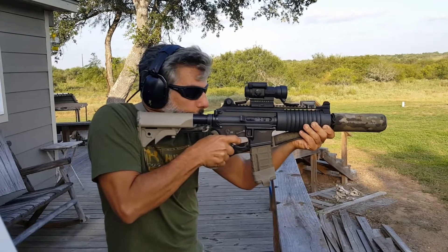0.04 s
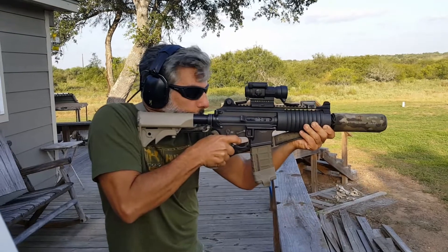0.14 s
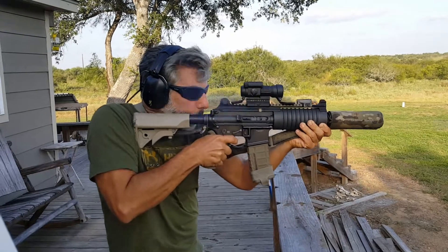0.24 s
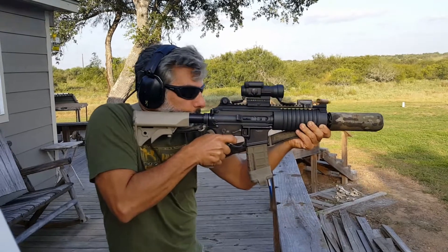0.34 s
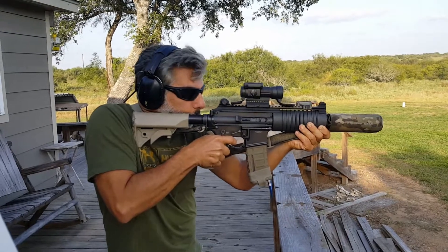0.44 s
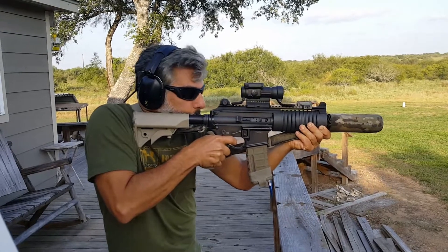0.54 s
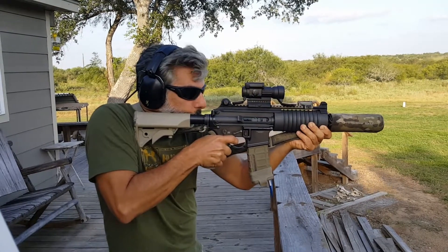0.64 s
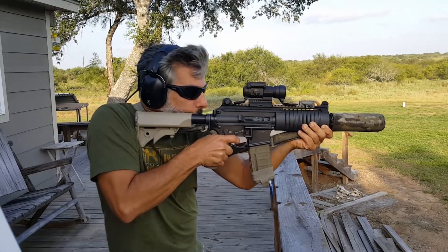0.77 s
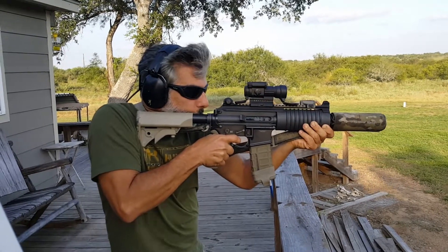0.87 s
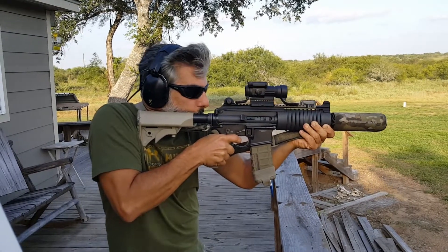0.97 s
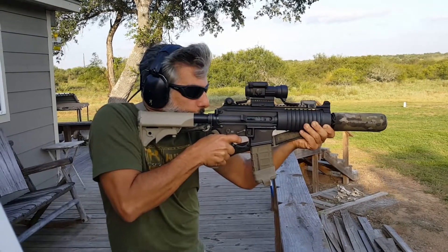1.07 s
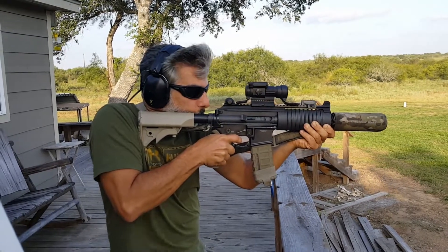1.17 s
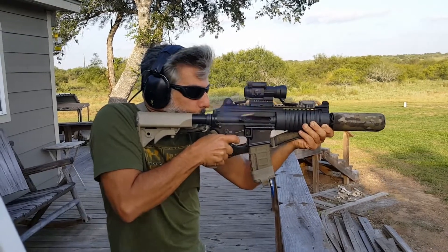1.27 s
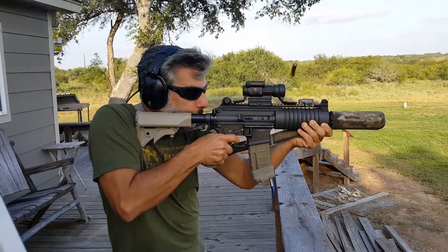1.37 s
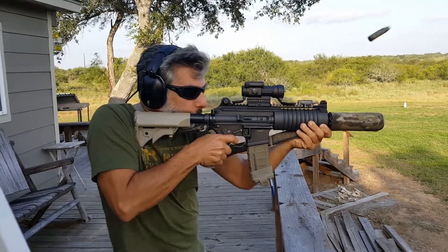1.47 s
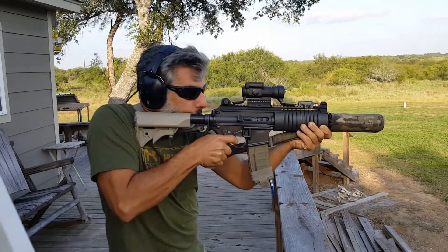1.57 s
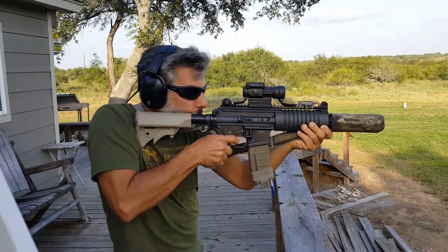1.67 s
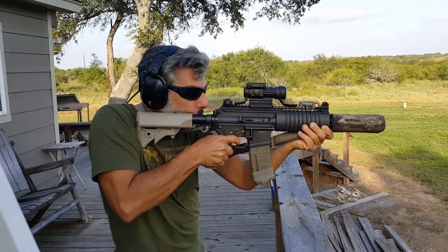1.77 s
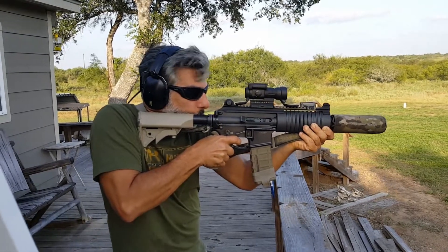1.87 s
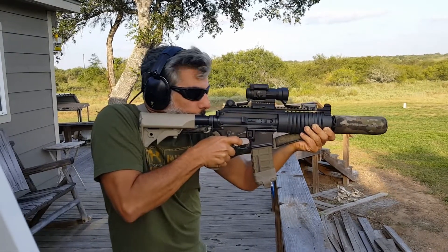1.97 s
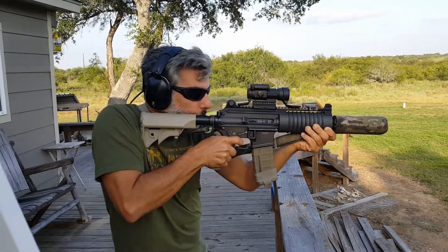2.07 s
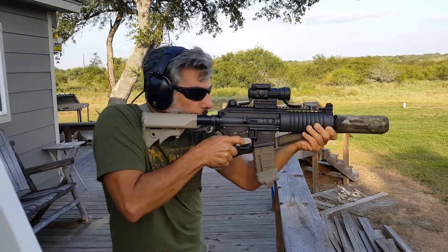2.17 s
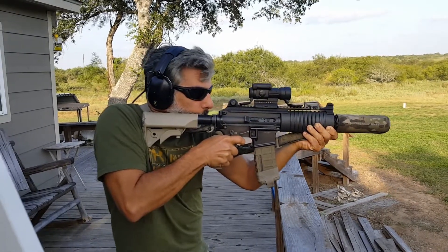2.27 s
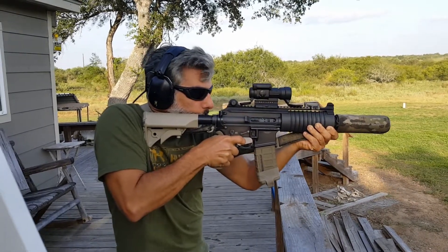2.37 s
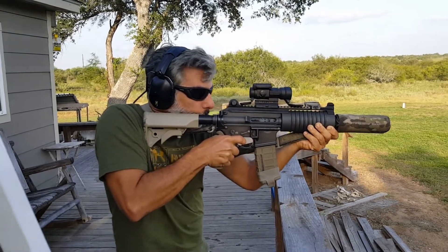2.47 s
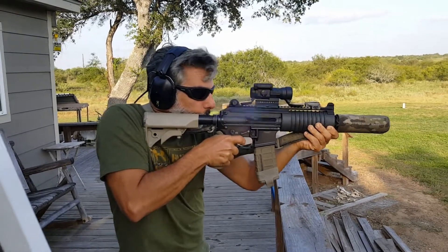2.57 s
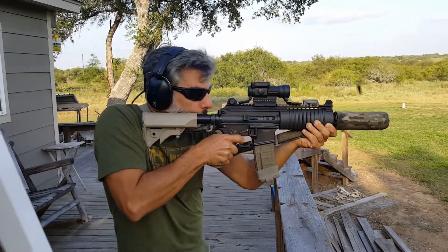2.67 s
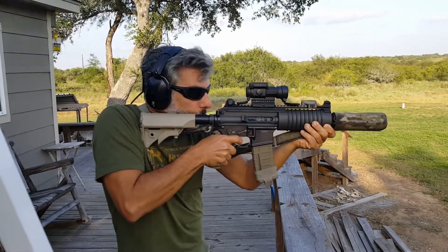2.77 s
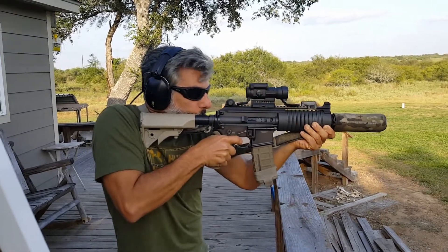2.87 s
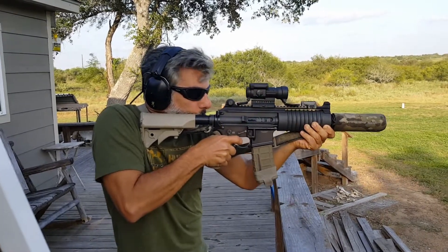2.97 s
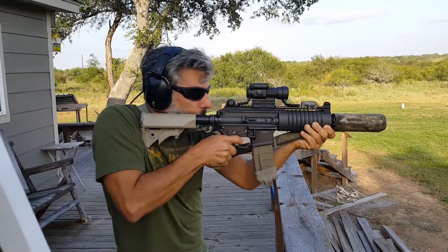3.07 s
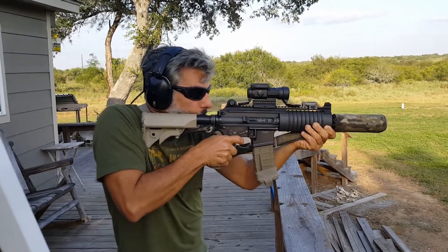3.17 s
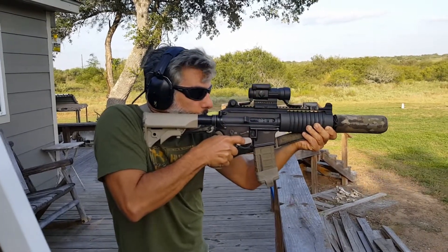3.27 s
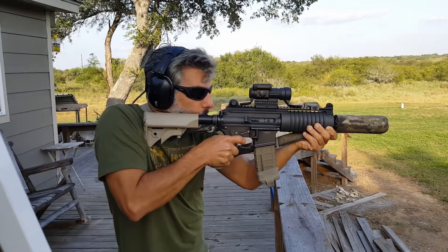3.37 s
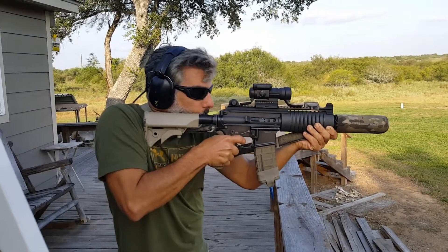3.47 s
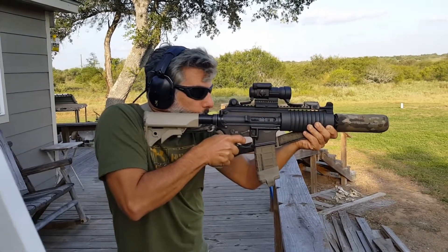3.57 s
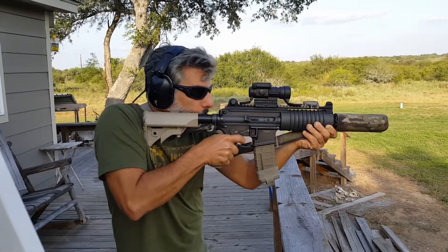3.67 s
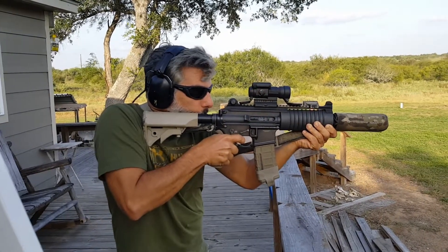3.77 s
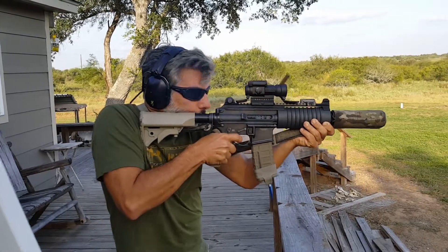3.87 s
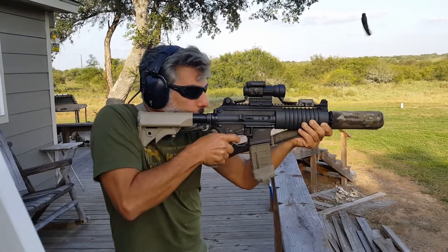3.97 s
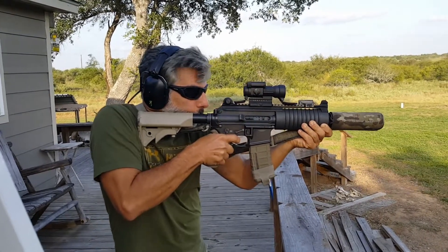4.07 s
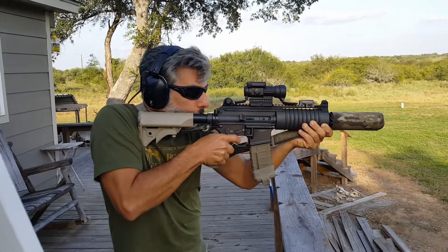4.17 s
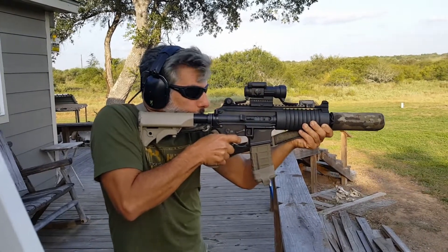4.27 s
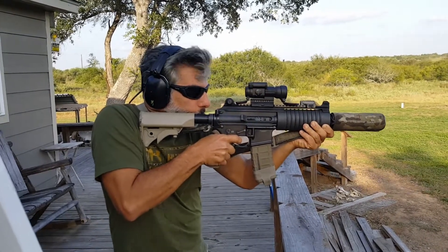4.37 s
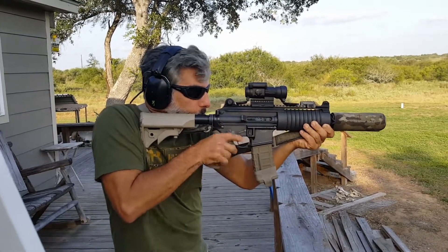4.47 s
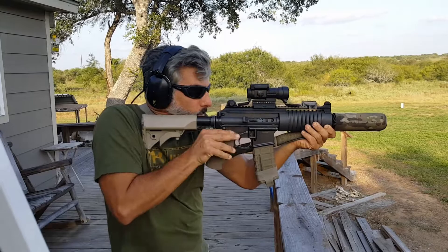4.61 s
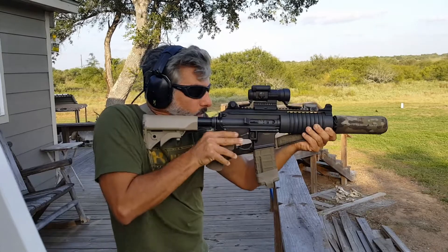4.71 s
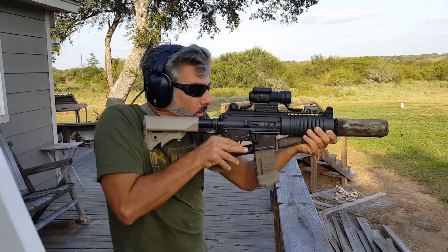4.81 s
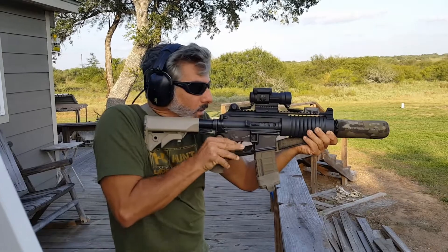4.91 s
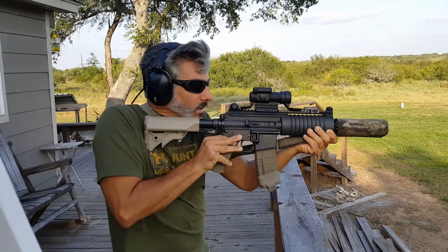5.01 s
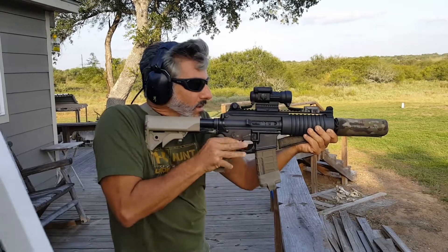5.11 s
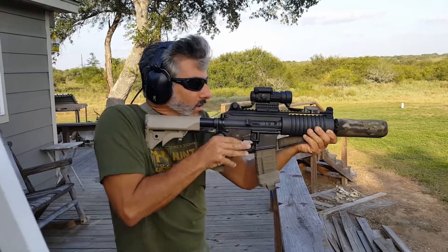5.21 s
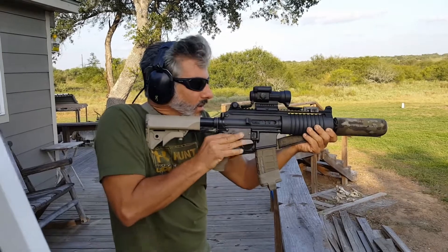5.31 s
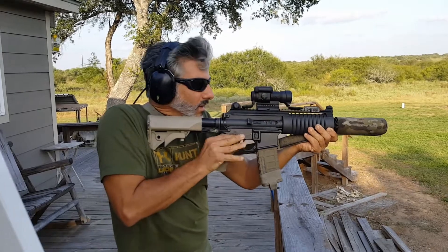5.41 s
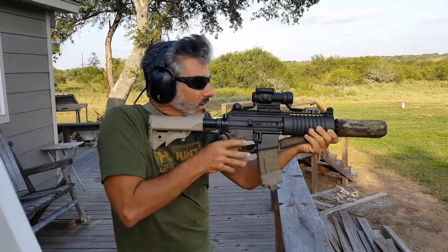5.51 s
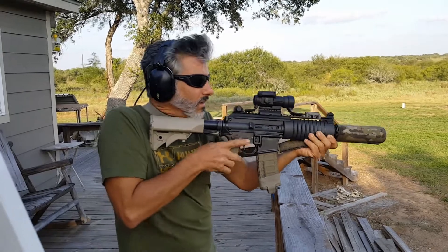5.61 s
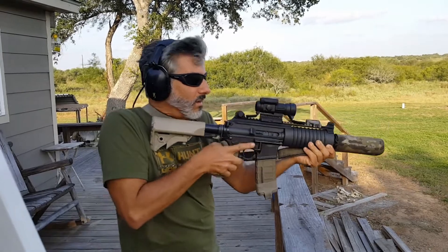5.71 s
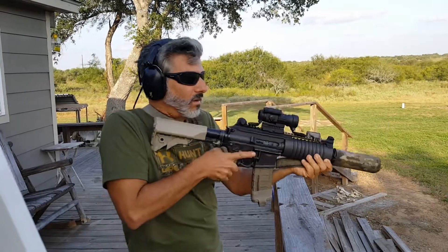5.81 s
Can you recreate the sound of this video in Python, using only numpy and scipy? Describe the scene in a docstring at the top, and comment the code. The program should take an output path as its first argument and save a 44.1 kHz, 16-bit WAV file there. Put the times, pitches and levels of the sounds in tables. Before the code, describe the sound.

A slow, steady string of four muffled but sharp gunshots in open country, heard close from a hard, short-sounding porch. Each blast carries quick mechanical knocks and fades into rough field echoes. Distant steel rattles after the first three; spent cases tap wooden planks. Finally clicks, clacks and cloth rustle as the gun is handled, over leaf hiss and wind buffeting the small device's overloaded microphones.

```python
"""Rifle shots on a porch

Four suppressed rifle shots are heard close up on a wooden porch: a pulse and a noisy jet of gas,
with short knocks around each blast. Filtered noise makes the porch and the tree lines answer.
Ringing tones and short noise bursts make the clanks of a far steel plate, brass cases on the boards
and clicks of the rifle's parts, most of them at the end. Shaped noise makes wind, leaves and cloth.
"""
import sys
import numpy as np
from scipy import signal
from scipy.io import wavfile
from scipy.ndimage import uniform_filter1d

SR = 44100
rng = np.random.default_rng(int(sys.argv[2]) if len(sys.argv) > 2 else 0)


def wrap_up_sound(samples):
    """Save the sound to the file named by the first command line argument, as 16-bit audio."""
    columns = np.atleast_2d(samples).T
    # keep every value between -1 and 1, then stretch to whole-number steps
    tamed = np.clip(columns, -1, 1)
    steps = np.round(tamed * 32767).astype(np.int16)
    wavfile.write(sys.argv[1], SR, steps)


N = 257984  # length in samples

# the four shots, also used by the knocks and the field: t/s, relative level/dB
SHOTS = [(0.2471, -0.5), (1.3032, 1), (2.6095, 1.5), (3.8347, 1.5)]
# tone colour of the blast: f/Hz, relative level per Hz/dB
BLAST_COLOUR = [(35, -83), (60, -14), (198, -8.5), (330, -2.5), (492, -2.5), (566, -6), (651, -2), (749, 1),
                (1140, -6.5), (2410, -6.5), (5460, -15.5), (7400, -19), (8510, -11.5), (16000, -19)]


def muzzle_blasts():
    """A pressure pulse and a gas jet leave the muzzle, the bolt slams home, porch and trees answer."""
    bolt_delay_s = 0.046
    out = np.zeros((2, N))
    t = np.arange(2000) / SR
    for s, db in SHOTS:
        crack = pressure_pulse(t)
        jet = 0.34 * rng.standard_normal((2, len(t))) * np.exp(-t / 0.014)
        add(out, s, gain_of(db) * jet)
        add(out, s, gain_of(db + 10) * crack)
        add(out, s + bolt_delay_s, gain_of(db + 6) * crack)  # sharp edge of the bolt
        add(out, s, gain_of(db + 22) * porch(crack))
        add(out, s + 0.255, gain_of(db - 25.5) * bright_tree_echo())
    return coloured(out, BLAST_COLOUR)


def pressure_pulse(t):
    """A sudden rise in pressure that dips below zero and dies away within a millisecond."""
    u = t / 0.00005
    return panned((1 - u) * np.exp(-u), 0)


def bright_tree_echo():
    """A bright tree-line echo: a soft swell of mid-treble noise a quarter second after the shot."""
    t = np.arange(6000) / SR
    band = signal.butter(2, [3000, 4600], "band", fs=SR, output="sos")
    trees = signal.sosfilt(band, rng.standard_normal((2, len(t))))
    return trees * t / 0.02 * np.exp(-t / 0.025)


# short knocks around each shot, from just before it to the bolt closing:
# t from the shot/s, peak level relative to the shot/dB, f/Hz, time to fall 60 dB/s
KNOCKS = [(-.006, -15, 2027, .025), (-.003, -10, 1287, .02), (.014, -17.5, 500, .04), (.027, -11, 600, .05),
          (.034, -12, 345, .05), (.046, -9, 1953, .012)]


def short_knocks():
    """Knocks around the blast: low thumps thrown back by the house wall, and the bolt closing.

    Each knock is two short tones, drawn anew for each side.
    """
    out = np.zeros((2, N))
    for s, db in SHOTS:
        for delay, knock_db, hz, t60 in KNOCKS:
            sides = []
            for side in "LR":
                modes = [(hz * rng.uniform(0.9, 1.1), 0, t60), (1.4 * hz, -3, t60)]
                sides.append(ring(modes, 0.1, scatter_db=1.5))
            add(out, s + delay, gain_of(db + knock_db) * np.array(sides))
    return out


# tree lines that return each shot: t after the shot/s, level before colouring/dB, fade/dB per s
FIELD = [(0.139, -44.5, 72), (0.262, -44.5, 86.5), (.37, -49, 95.5), (.73, -51.5, 39.5)]
# tone colour of the field's answer: f/Hz, relative level per Hz/dB
FIELD_COLOUR = [(180, -86), (300, -54.5), (645, -49), (713, -12.5), (915, -15), (994, -17), (2880, -0.5),
                (6200, -18), (8640, -19), (16000, -54)]


def field_echoes():
    """Tree lines scatter each shot back as lumpy noise, over a faint wash from farther off."""
    rise_s = 0.049
    out = np.zeros((2, N))
    t = np.arange(round(1.3 * SR)) / SR
    level = gain_of(-63.5)  # the far wash, steady
    for delay, db, fade in FIELD:
        swell = np.clip((t - delay) / rise_s, 0, 1)
        level = level + swell * gain_of(db - fade * np.maximum(t - delay - rise_s, 0))
    for s, db in SHOTS:
        lumps = gain_of(db) * flutter(1.2, len(t), 500)
        add(out, s, level * lumps * rng.standard_normal((2, len(t))))
    return coloured(out, FIELD_COLOUR)


# how the porch rings on: f/Hz, time to fall 60 dB/s, build-up time/s
PORCH = [(100, 0.29, 0.015), (298, 0.34, 0.021), (852, 0.23, 0.0043), (1853, 0.24, 0.0037),
         (5000, 0.27, 0.0027), (10000, 0.25, 0.0013), (16000, 0.22, .001)]


def porch(x):
    """Dense reflections from all sides: each reaches the two spaced microphones a little apart."""
    taps = np.zeros((2, SR // 2))
    at = np.arange(30, SR // 2 - 40, 8)
    at = at + rng.integers(0, 8, len(at))
    lag = np.round(10 * np.sin(rng.uniform(-np.pi, np.pi, len(at)))).astype(int)  # samples
    # a few posts and walls stand out
    size = rng.choice([-1.0, 1.0], len(at)) * gain_of(4.5 * rng.standard_normal(len(at)))
    np.add.at(taps[0], at + lag, size)
    np.add.at(taps[1], at - lag, size)
    # each pitch builds up and fades at its own pace
    hz, t, z = signal.stft(taps, SR, nperseg=256, noverlap=192)
    build = 1 - np.exp(-(t + 0.001) / read(PORCH, hz, column=2)[:, None])
    fade = gain_of(-60 * t / read(PORCH, hz)[:, None])
    tail = signal.istft(z * build * fade, SR, nperseg=256, noverlap=192)[1]
    return signal.oaconvolve(x, tail / np.linalg.norm(tail[0]), axes=1)


# clanks from the plate: t/s, peak level of the smack/dB, f of the smack/Hz, left-right level/dB
CLANKS = [(0.6307, -18, 2160, 1), (0.6474, -22, 2480, -18), (0.6599, -22.5, 2420, 24),
          (0.6744, -24, 2080, -10), (1.6853, -13.5, 2740, 3), (1.6994, -27, 2070, -19),
          (1.715, -19.5, 2380, 2), (1.7609, -27, 2960, 1), (2.9926, -26, 2880, -12),
          (3.0216, -30, 2300, 15.5)]
# tones of the steel plate: f/Hz, relative level/dB, time to fall 60 dB/s
PLATE = [(2100, 0, .15), (2400, -3, .12), (3480, -9, .15), (4900, -23, 1.4), (5600, -18, .25),
         (8123, -20, .45), (8480, -21, .2), (10150, -25, .2), (11160, -24, .15), (12500, -30, .2),
         (13970, -31, .2)]


def plate_clanks():
    """The bullet smacks a far steel plate: a short knock, a wavering metal ring and a rattle."""
    out = np.zeros((2, N))
    for s, db, hz, pan_db in CLANKS:
        t60 = 0.014
        smack = ring([(hz, 0, t60), (0.752 * hz, -4, t60), (0.37 * hz, -15, t60)], 0.1, scatter_db=1.5)
        add(out, s, gain_of(db) * panned(smack, pan_db))
        metal = ring(PLATE, 0.5, scatter_db=3)
        waver = flutter(3.7, len(metal), 400)  # air over the range shakes the ring
        add(out, s, gain_of(db - 20) * panned(metal * waver, pan_db))
        add(out, s, gain_of(db - 13.5) * panned(rattle(t60=0.054), pan_db))
    return out


# brass cases on the boards: t/s, peak level of the knock/dB, tilt of the knock/dB per octave,
# rattle level/dB, rattle time to fall 60 dB/s, bright snap level/dB, brass ring level/dB,
# share of the lower brass tone/0-1, left-right level/dB
BOUNCES = [(0.983, -29.5, 8.5, -34, 0.36, -74, -55.5, 0.6, 0.7),
           (1.205, -33, 10, -34, .05, -64, -75.5, 1, 0.1),
           (2.134, -22, 7.5, -25, 0.14, -57.5, -59, 0.3, -1.5),
           (2.342, -19, 2, -27.5, 0.046, -65, -70.5, 0.7, -2.5),
           (2.453, -38, 1, -26.5, 0.042, -66.5, -67.5, 0.24, 4),
           (2.546, -49.5, -4.7, -46.5, 0.078, -55.5, -62, 0.3, 1.5),
           (3.513, -40, 5, -42.5, 0.039, -46.5, -41.5, 0.4, 4),
           (3.654, -44.5, 1.5, -45, 0.04, -53.5, -50.5, 0.25, -1),
           (4.709, -24.5, -4, -21, 0.11, -54, -73, 0.3, 1.5)]
# tones of the boards: f/Hz, relative level before the tilt/dB, time to fall 60 dB/s
BOARDS = [(409, -4.5, 0.072), (496, -5.5, 0.043), (840, -11.5, 0.055), (953, -2, .03), (1307, -16.5, .025),
          (1720, -20.5, 0.039), (2400, -2.5, 0.01), (3150, -38.5, .015)]
# two tones of a brass case: f/Hz, time to fall 60 dB/s
BRASS = [(12110, .25), (15390, .3)]


def case_bounces():
    """A brass case strikes the boards: wooden knock, rattle, dull scuff, bright snap, brass ring."""
    out = np.zeros((2, N))
    t = np.arange(SR // 2) / SR
    dull = signal.butter(2, 890, fs=SR, output="sos")
    for s, db, tilt_db, rattle_db, rattle_t60, snap_db, brass_db, low, pan_db in BOUNCES:
        boards = [(hz, mode_db + tilt_db * np.log2(hz / 1000), t60) for hz, mode_db, t60 in BOARDS]
        add(out, s, gain_of(db) * panned(ring(boards, 0.2, scatter_db=2.2), pan_db))
        add(out, s, gain_of(rattle_db) * panned(rattle(t60=rattle_t60), pan_db))
        # dull tail as the boards shake on
        scuff = signal.sosfilt(dull, rattle(t60=1.6 * rattle_t60))
        add(out, s + 0.006, gain_of(rattle_db + 0.5) * panned(scuff, pan_db))
        add(out, s, panned(snap(snap_db), pan_db))
        tumble = flutter(3, (2, len(t)), 300)  # the case spins as it rings
        for (hz, t60), share in zip(BRASS, np.clip([low, 1 - low], 0, 1)):
            tone = gain_of(brass_db - 60 * t / t60) * np.sin(2 * np.pi * hz * t)
            add(out, s, share * tone * tumble)
    return out


# trigger, selector and handling clicks: t/s, peak level of the body/dB, f of the body/Hz,
# rattle level/dB, bright snap level/dB, left-right level/dB
CLICKS = [(1.462, -27, 2240, -25.5, -49, -1), (3.192, -43, 851, -33, -57.5, -1),
          (4.44, -44.5, 880, -31, -55, 0.5), (4.977, -36.5, 3900, -39, -58.5, 6),
          (5.055, -32.5, 2590, -51, -58, -5), (5.153, -18, 1493, -19.5, -62, 3.5),
          (5.261, -30, 2990, -55, -41, -4), (5.297, -20, 740, -19.5, -34.5, 1),
          (5.44, -29, 2900, -36, -74, -2), (5.614, -36, 670, -48, -73, 1.5),
          (5.735, -33, 602, -32, -73, -6), (5.807, -34, 606, -36, -69, 6)]


def handling_clicks():
    """Small parts of the rifle click: three short tones, a rattle and a bright snap together."""
    out = np.zeros((2, N))
    for s, db, hz, rattle_db, snap_db, pan_db in CLICKS:
        t60 = 0.023
        modes = [(hz, 0, t60), (0.55 * hz, -6, 1.5 * t60), (1.5 * hz, -6, 0.6 * t60)]
        click = gain_of(db) * ring(modes, 0.2, scatter_db=2.2)
        click += gain_of(rattle_db) * rattle(t60=0.057)
        click[:900] += snap(snap_db)
        add(out, s, panned(click, pan_db))
    return out


# tone colour of a contact's rattle: f/Hz, relative level per Hz/dB
RATTLE_COLOUR = [(180, -31), (300, -4), (502, 1), (1250, -3.5), (2400, -3), (6410, -25.5), (8500, -39),
                 (14500, -113), (16000, -34)]


def rattle(t60):
    """The noisy part of a contact: a spiky burst that dies fast, peak about 1."""
    t = np.arange(SR // 5) / SR
    spikes_db = 2.7 * rng.standard_normal(len(t))
    grit = rng.standard_normal(len(t)) * gain_of(spikes_db - 60 * t / t60)
    return coloured(grit[None], RATTLE_COLOUR)[0] / 2


def snap(db):
    """The bright edge of a hard contact: band-passed noise a few milliseconds long."""
    band = signal.butter(1, [2200, 8000], "band", fs=SR, output="sos")
    grit = signal.sosfilt(band, rng.standard_normal(900))
    u = np.arange(900) / SR / 0.0018
    return gain_of(db) * 8 * grit * u * np.exp(-u)


def ring(modes, seconds, scatter_db):
    """One blow on a set of fading tones, peak 1; each blow favours other tones."""
    t = np.arange(round(seconds * SR)) / SR
    x = np.zeros(len(t))
    for hz, db, t60 in modes:
        level = gain_of(db + scatter_db * rng.standard_normal() - 60 * t / t60)
        x += level * np.sin(2 * np.pi * hz * t)
    x *= 1 - np.exp(-t / 0.0007)  # the contact takes a moment
    return x / abs(x).max()


# slow strength of the wind at the microphones: t/s, level/dB
WIND = [(0, -42.5), (.17, -36.5), (.4, -49.5), (.92, -46), (1.1, -35.5), (1.29, -32.5), (1.45, -45.5),
        (1.93, -46.5), (2.2, -36), (2.45, -43.5), (2.9, -49), (3.35, -49.5), (3.55, -42), (4.05, -53),
        (4.5, -50.5), (5, -41), (5.3, -29.5), (5.53, -36.5), (5.58, -37.5), (5.64, -31.5), (5.85, -30.5)]
# single thumps of wind: t/s, level/dB, half-width/s
PUFFS = [(.53, -39.5, 0.022), (.78, -49, 0.091), (2.04, -34, 0.019), (2.59, -33, 0.035), (3.42, -41.5, .02),
         (3.51, -34, 0.0096), (3.8, -40.5, 0.028), (4.7, -45.5, .07), (5.52, -33.5, 0.031),
         (5.81, -34, 0.011)]


def gust(t):
    """Wind at the microphones: the slow strength plus the single thumps."""
    return curve(WIND, t) + swells(PUFFS, t)


def wind_rumble():
    """Eddies press on the two microphones separately: lumpy low noise, brighter in strong gusts."""
    noise, lumps, hz, t = noise_frames()
    eddies = 2.5 * evened(uniform_filter1d(uniform_filter1d(lumps, 5, 1), 6, 2))  # short lumps, dB
    top_hz = 190 * (gust(t) / gain_of(-28)) ** 0.16  # a stronger gust reaches higher
    bass_cut = (hz ** 2 / (hz ** 2 + 110 ** 2)) ** 2
    treble_cut = 1 / (1 + (hz / top_hz) ** 2) ** 1.42
    buffet = 0.78 * evened(uniform_filter1d(lumps[:, :1], 8, 2))  # all pitches together, dB
    wind = from_frames(noise * bass_cut * treble_cut * gain_of(eddies) * gain_of(buffet))
    pops = flutter(2.65, (2, N), 250)  # small eddies burst on each port
    return evened(wind * pops) * gust(np.arange(N) / SR)


# breeze in the leaves: t/s, level/dB
BREEZE = [(0, -47), (2.3, -49), (3.25, -53), (3.45, -42.5), (3.8, -51.5), (4.4, -55), (4.65, -43),
          (5.1, -50.5), (5.5, -59), (5.85, -45)]
# tone colour of the leaves: f/Hz, relative level per Hz/dB
LEAVES_COLOUR = [(240, -34.5), (400, -11), (636, -7.5), (921, -11), (1110, -11.5), (1560, -12), (2710, -4),
                 (3580, -17), (3870, -14.5), (6850, -69.5), (8370, -50), (16000, -74)]


def leaves():
    """Many leaves brush together: a steady-coloured hiss with soft patches, led by the breeze."""
    noise, lumps, hz, t = noise_frames()
    patches = evened(uniform_filter1d(uniform_filter1d(lumps[0], 16, 0), 25, 1))
    hiss = from_frames(noise * gain_of(read(LEAVES_COLOUR, hz) + 1.2 * patches))
    return hiss * curve(BREEZE, np.arange(N) / SR)


# moves of cloth and sling: t/s, level before colouring/dB, half-width/s
RUSTLE = [(.2, -55.5, .15), (3.72, -50.5, 0.1), (5.07, -44, 0.045), (5.19, -44.5, 0.048),
          (5.27, -36.5, .015), (5.42, -49.5, 0.11), (5.75, -51, 0.063), (5.85, -40, 0.012)]


def cloth():
    """Cloth and sling rub as they move: grainy noise that swells with each move."""
    grains = rng.standard_normal((2, N)) * flutter(2.2, N, 300)
    colour = [(300, -14.5), (1500, 8.5), (4000, 7), (9000, -12), (16000, -17)]  # f/Hz, level/dB
    return coloured(grains, colour) * swells(RUSTLE, np.arange(N) / SR)


def noise_frames():
    """Short overlapping slices of random spectrum, random lumps, their pitches and their times."""
    frames = N // 128 + 9
    hz = np.fft.rfftfreq(1024, 1 / SR)[:, None]
    a, b, lumps = rng.standard_normal((3, 2, 513, frames))
    return a + 1j * b, lumps, hz, np.arange(frames) * 128 / SR


def from_frames(spectrum):
    """Joins spectrum slices into sound of rms 1."""
    return evened(signal.istft(spectrum, nperseg=1024, noverlap=896)[1][:, :N])


def gain_of(db):
    """Decibels to a factor."""
    return 10 ** (np.asarray(db) / 20)


def evened(x):
    """Scales to rms 1."""
    return x / np.sqrt(np.mean(x ** 2) + 1e-20)


def flutter(db, shape, width):
    """A random wavering gain, db rms in size, smoothed over width samples."""
    return gain_of(db * evened(uniform_filter1d(rng.standard_normal(shape), width)))


def curve(rows, t):
    """A level curve in dB as a factor."""
    return gain_of(np.interp(t, *np.transpose(rows)))


def swells(rows, t):
    """Sum of bell-shaped swells, as a factor."""
    return sum(gain_of(db) * np.exp(-0.5 * ((t - s) / width) ** 2) for s, db, width in rows)


def read(points, hz, column=1):
    """A spectrum table joined on a log-frequency axis."""
    points = np.transpose(points)
    return np.interp(np.log(hz + 1), np.log(points[0] + 1), points[column])


def coloured(x, points):
    """Filters with the shape of a spectrum table, without sounding ahead of time."""
    log_gain = np.log(gain_of(read(points, abs(np.fft.fftfreq(8192, 1 / SR)))))
    taps = np.fft.ifft(np.exp(np.conj(signal.hilbert(log_gain)))).real[:2048]
    return signal.oaconvolve(x, taps[None] / np.linalg.norm(taps), axes=1)[:, :x.shape[1]]


def panned(x, pan_db):
    """Mono to two channels, the left louder by pan_db."""
    return x * gain_of([[pan_db / 2], [-pan_db / 2]])


def add(mix, s, sound):
    """Mixes a two-channel sound in at time s."""
    part = mix[:, round(s * SR):][:, :sound.shape[1]]
    part += sound[:, :part.shape[1]]


def scene():
    """The shots, the small hits with their porch reflections, and the open air."""
    shots = muzzle_blasts() + short_knocks() + field_echoes()
    hits = plate_clanks() + case_bounces() + handling_clicks()
    reflections = gain_of(-5) * porch(hits)[:, :N]
    return shots + hits + reflections + wind_rumble() + leaves() + cloth()


def record(dry):
    """The small microphones lose the deepest bass and saturate on the blasts; then the band limit."""
    dry = signal.sosfilt(signal.butter(2, 55, "high", fs=SR, output="sos"), dry)
    held = dry / (1 + abs(dry / 0.95) ** 4) ** 0.25  # bends softly towards 0.95
    band_limit = signal.firwin(511, 16200, window=("kaiser", 9), fs=SR)
    return signal.oaconvolve(held, band_limit[None], "same")


dry = scene()
out = record(dry)
wrap_up_sound(out)
```